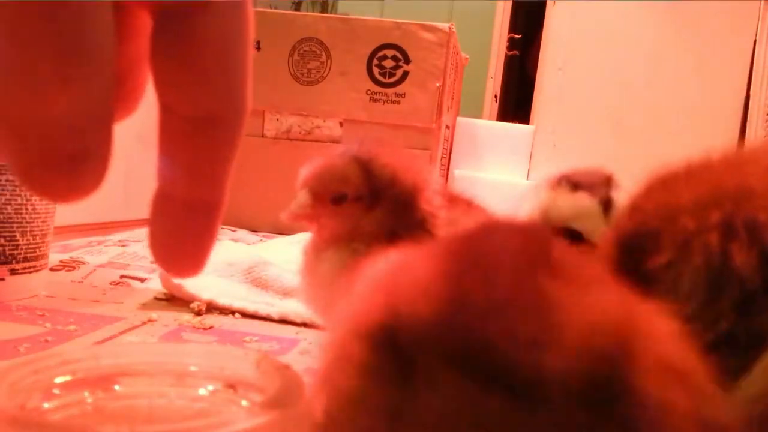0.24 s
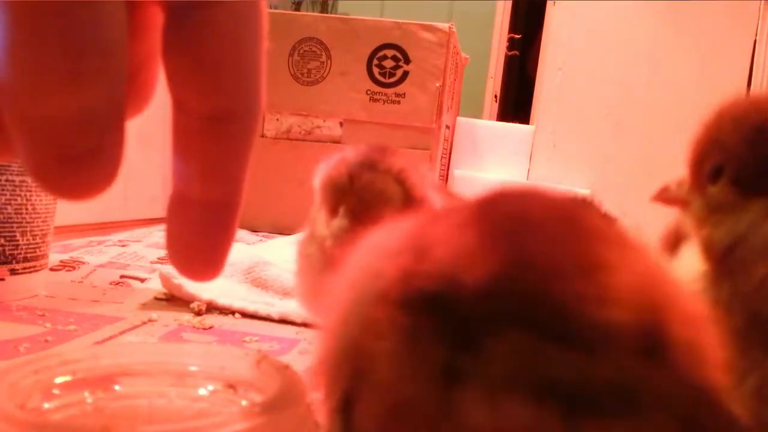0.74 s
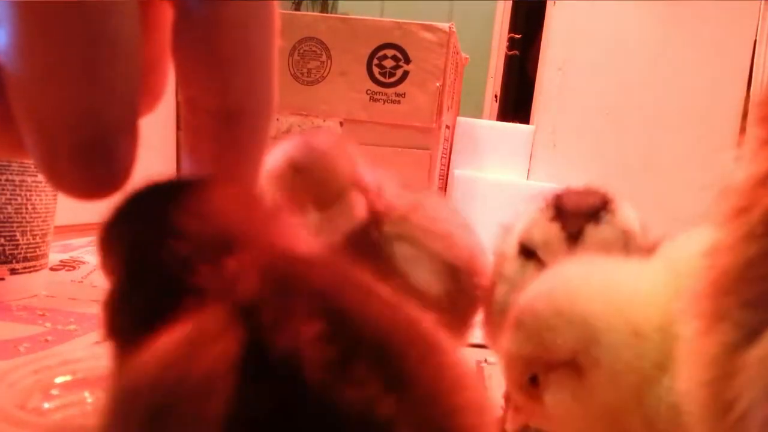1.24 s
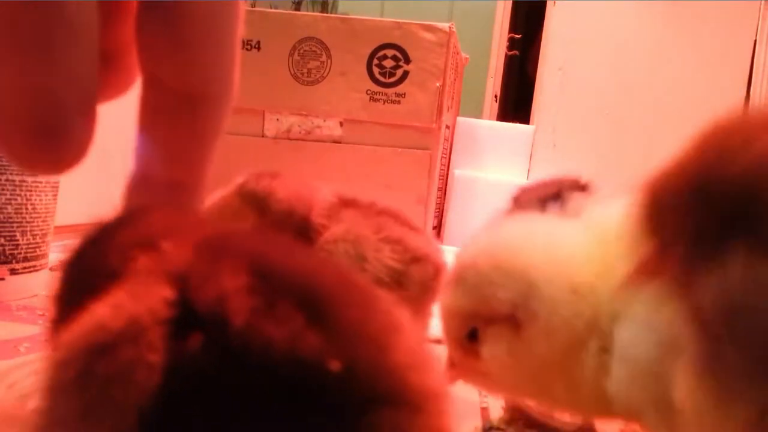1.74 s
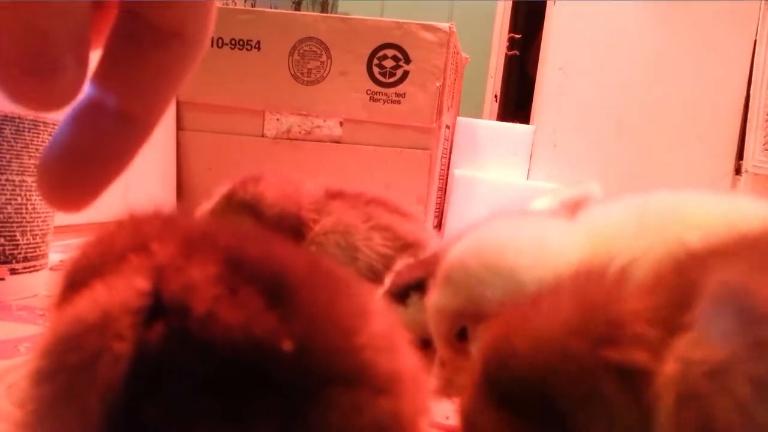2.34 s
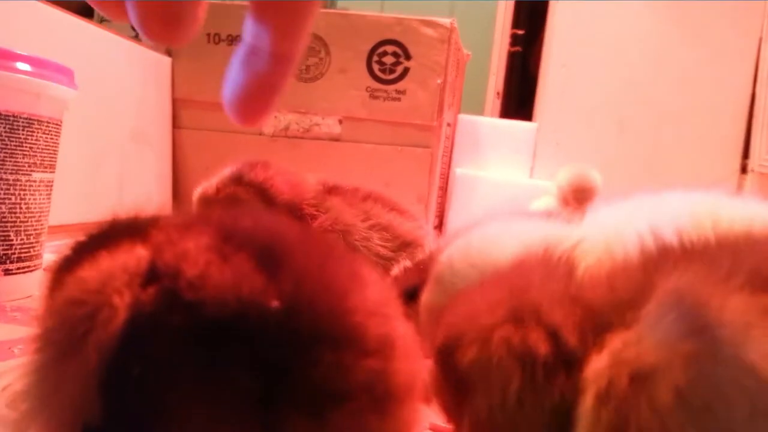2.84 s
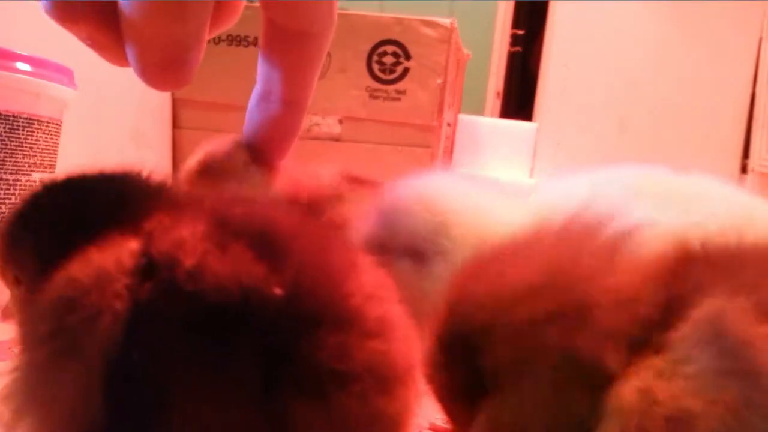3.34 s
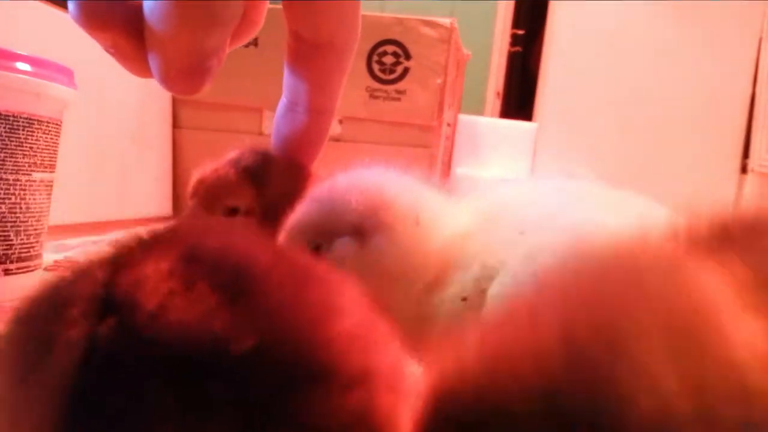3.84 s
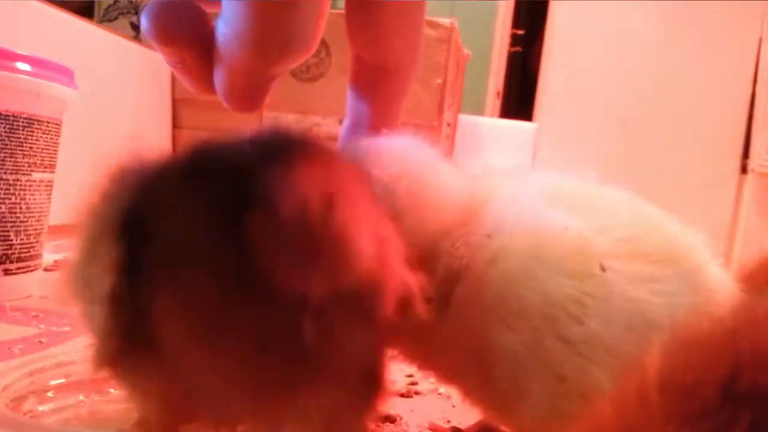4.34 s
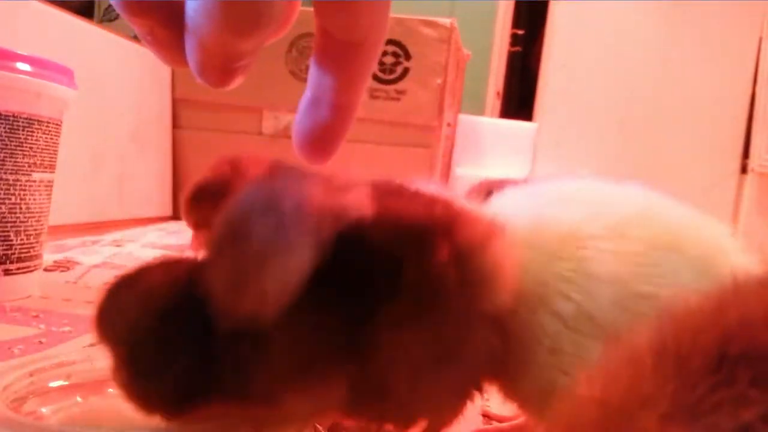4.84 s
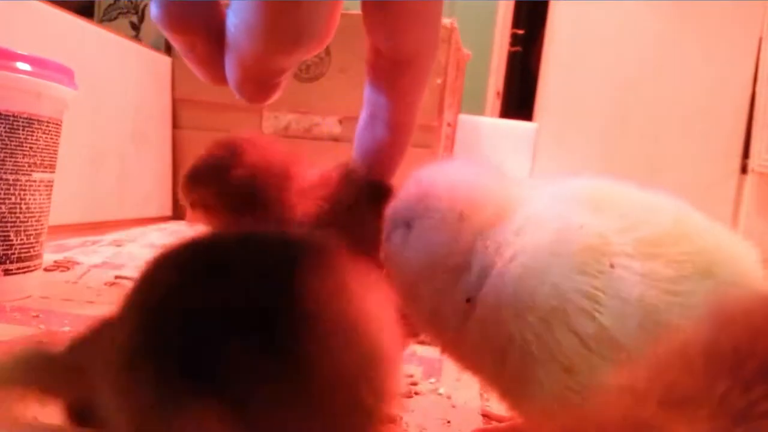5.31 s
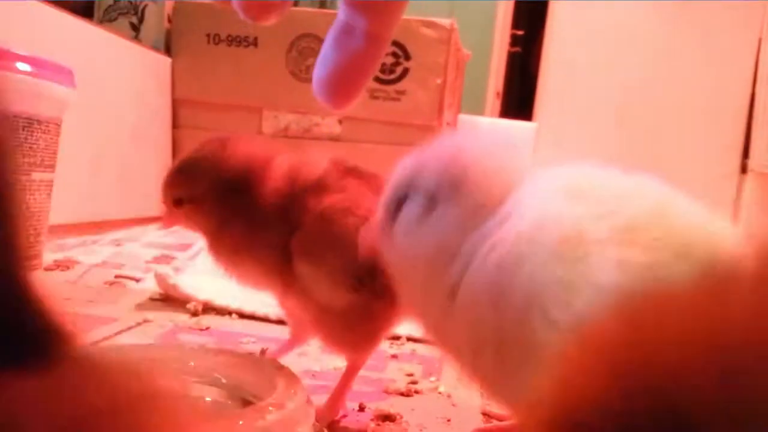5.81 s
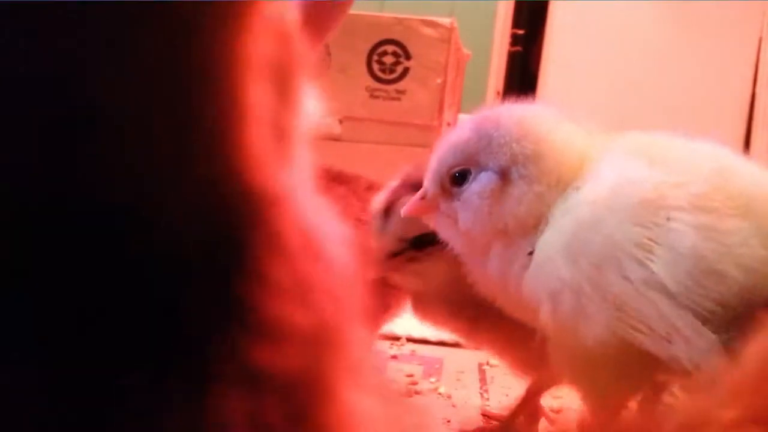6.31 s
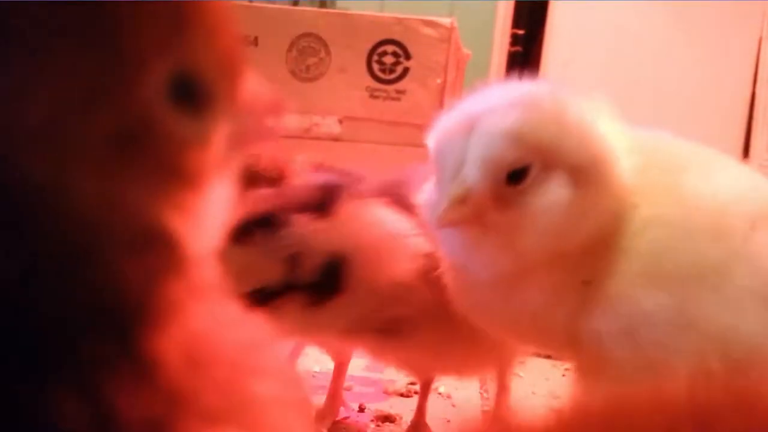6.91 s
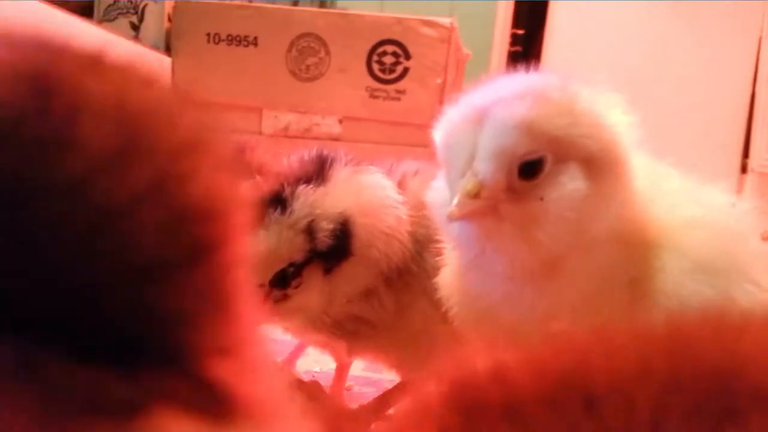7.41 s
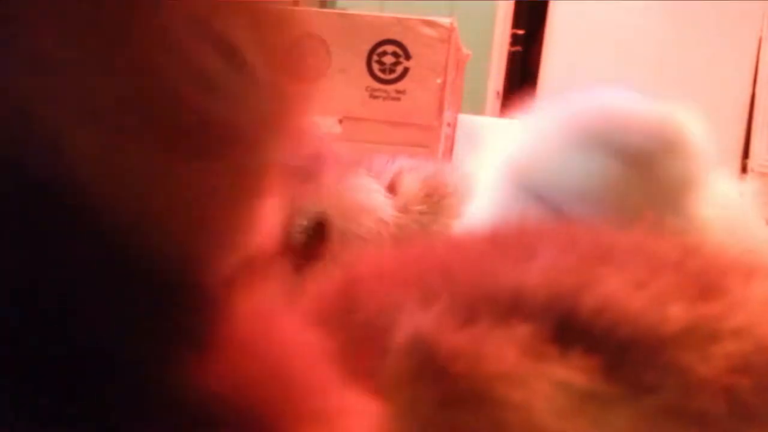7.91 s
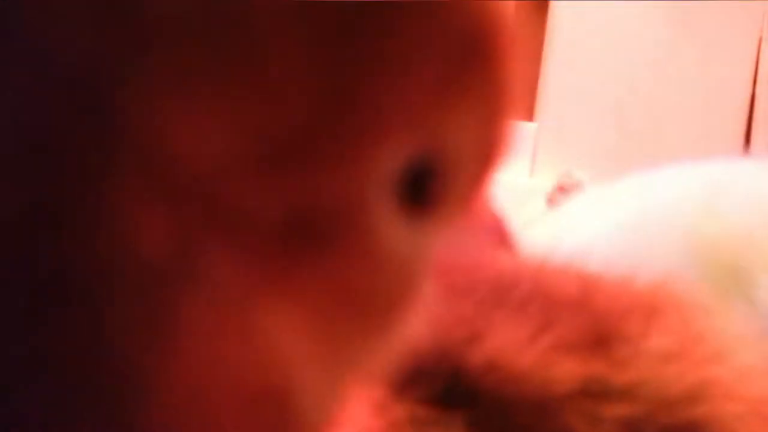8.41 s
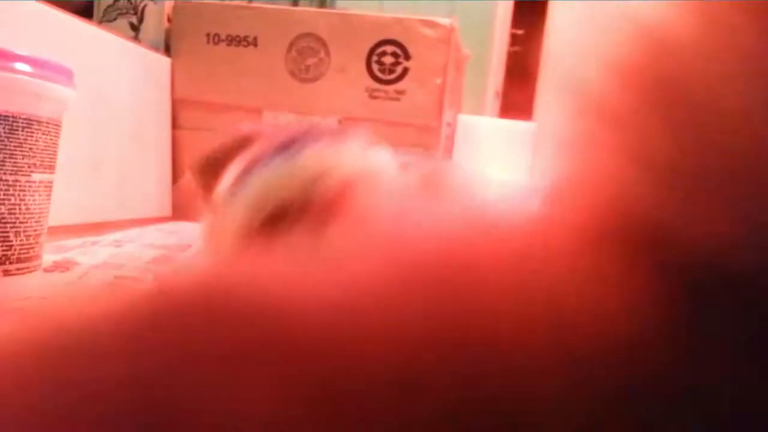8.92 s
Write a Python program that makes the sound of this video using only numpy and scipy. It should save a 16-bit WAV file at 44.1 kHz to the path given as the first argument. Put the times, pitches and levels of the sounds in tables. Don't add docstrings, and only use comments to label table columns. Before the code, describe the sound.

Young chicks peep inches from a phone microphone in a small cardboard pen with a short, boxy echo and faint air hiss. From 0 to 2 seconds, a hard peck opens, then faint quick cheeps mix with blunt knocks, claw ticks and a cluster of scuffing thuds near 1.5. From 2 to 4, it is sparser: soft rising whistles, low reedy peeps, a few pecks and a sharp claw strike around 3. Louder clear peeps come at about 4.2, a brief bright squeal at 4.7, then busy bumping and scraping from 5 to 6, some hits overloading. From 6 to 8, strong and reedy peeps come thicker, with heavy pecks near 7 and 7.5 and an upward reedy squeal at 7.6. From 8 to 9.2, loud overlapping chirps, a very sharp claw snap and a reedy squeal at 8.8, then closing peeps and ticks.

```python
import sys
import numpy as np
from scipy import signal
from scipy.fft import rfft, irfft
from scipy.io import wavfile
from scipy.ndimage import uniform_filter1d

SR = 44100
rng = np.random.default_rng(int(sys.argv[2]) if len(sys.argv) > 2 else 0)


def to_wav(sig):
    pcm = np.clip(np.atleast_2d(sig), -1, 1) * 32767
    pcm = np.round(pcm).astype(np.int16)
    wavfile.write(sys.argv[1], SR, pcm.T)


def ratio_of_db(decibels):
    return 10 ** (np.asarray(decibels, float) / 20)


N = 403956


def band(x, lo_hz, hi_hz):
    return signal.sosfilt(signal.butter(1, [lo_hz, hi_hz], "bandpass", fs=SR, output="sos"), x)


def unit(x):
    return x / np.sqrt(np.mean(x ** 2))


def walk(rate_hz):
    k = int(SR / rate_hz)
    held = np.repeat(rng.standard_normal(N // k + 1), k)
    return unit(uniform_filter1d(uniform_filter1d(held, k), k)[:N])


def add(out, s, sound):
    i = int(s * SR)
    out[i:i + len(sound)] += sound[:len(out) - i]


# pitch_hz [Hz], level_db [dB per Hz]
AIR = [(25, -23), (100, -6.5), (250, 0), (500, -4), (1500, -12), (4000, -14), (6000, -16), (14000, -14.5)]


def air():
    hz, db = np.transpose(AIR)
    f = np.fft.rfftfreq(N, 1 / SR) + 1
    colour = rfft(rng.standard_normal(N)) * ratio_of_db(np.interp(np.log(f), np.log(hz), db))
    out, swell_db = 0, 1.3 * walk(5.5)
    for octave in range(4, 15):
        share = np.clip(1 - np.abs(np.log2(f) - octave), 0, 1)
        out = out + irfft(colour * share, N) * ratio_of_db(swell_db + 1.3 * walk(21))
    return unit(out) * ratio_of_db(-41)


def pen(x):
    t60_s, echo_db = 0.17, -11.5
    t = np.arange(SR // 3) / SR
    echo = rng.standard_normal(len(t)) * 1000. ** (-t / t60_s) * (t > .002)
    return signal.fftconvolve(x, echo / np.sqrt(np.sum(echo ** 2)))[:N] * ratio_of_db(echo_db)


def patter():
    ticks = (rng.random(N) < 50 / SR) * ratio_of_db(1.9 * np.minimum(rng.exponential(size=N), 3.0))
    spread = signal.lfilter([1], [1, -np.exp(-1 / (0.0032 * SR))], ticks)
    return spread * ratio_of_db(-36.5) * unit(band(rng.standard_normal(N), 400, 7500))


# pitch_hz [Hz], level_db [dB], t60_s [s]
FLOOR_MODES = [(264, -15.5, 0.15), (378, -18, 0.075), (560, -22.5, 0.06)]


def floor_ring(blows):
    t = np.arange(SR // 5) / SR
    ring = sum(ratio_of_db(db) * np.sin(2 * np.pi * hz * t) * 1000. ** (-t / t60) for hz, db, t60 in FLOOR_MODES)
    return signal.fftconvolve(blows, ring)[:N]


# middle_s [s], half_length_s [s], dull_db [dB], crisp_db [dB]
SCUFFS = [(0.018, 0.056, -30, -41), (1.316, 0.17, -36.5, -51), (1.478, 0.025, -21.5, -27.5),
          (1.542, 0.087, -27.5, -41), (1.803, 0.019, -44, -52), (2.046, 0.089, -45, -50),
          (2.1, 0.013, -32, -56), (2.74, 0.052, -34.5, -59.5), (3.405, 0.06, -33.5, -43),
          (3.9, 0.008, -27, -39), (4.317, 0.011, -35, -35), (4.451, 0.044, -36, -58),
          (4.754, 0.1, -31.5, -41.5), (5.073, 0.014, -32, -26), (5.196, 0.027, -14.5, -21.5),
          (5.33, 0.058, -31, -52), (5.597, 0.025, -16.5, -33), (5.746, 0.32, -34, -47),
          (5.885, 0.011, -21, -31), (6.016, 0.019, -29, -41), (6.35, 0.063, -40.5, -47),
          (6.654, 0.055, -37.5, -44), (6.979, 0.066, -31, -44), (7.796, 0.24, -34, -51),
          (8.455, 0.46, -42.5, -66.5), (3.753, 0.023, -48.5, -39), (7.428, 0.011, -29.5, -57),
          (8.607, 0.0057, -25.5, -58.5), (8.786, 0.12, -41, -43), (9.082, 0.18, -41, -59)]


def scuffs():
    t = np.arange(N) / SR
    slips = (rng.random(N) < 500 / SR) * ratio_of_db(9.0 * np.minimum(rng.exponential(size=N), 2.4))
    grain = unit(0.09 + signal.lfilter([1], [1, -np.exp(-1 / (0.0021 * SR))], slips))
    dull_gain, crisp_gain = np.zeros(N), np.zeros(N)
    for s, half, dull_db, crisp_db in SCUFFS:
        swell = np.exp(-np.square(np.square((t - s) / half)))
        dull_gain += ratio_of_db(dull_db) * swell
        crisp_gain += ratio_of_db(crisp_db) * swell
    grain += np.clip(dull_gain / ratio_of_db(-12), 0, 1) * (1 - grain)
    dull = dull_gain * grain * unit(band(band(rng.standard_normal(N), 142, 1610), 170, 2930))
    crisp = crisp_gain * grain * unit(band(rng.standard_normal(N), 1100, 9700))
    return ratio_of_db(7.0) * crisp + dull + ratio_of_db(-56) * floor_ring(dull)


# start_s [s], crisp_peak_db [dB], dull_db [dB against the crisp part]
TICKS = [(0.0596, -19, -3), (0.7476, -18.5, -10), (1.003, -26, -6), (1.1673, -26, -8), (1.1832, -16, -2.5),
         (1.373, -23, -5.5), (1.401, -21, -4), (1.4602, -10, 4), (1.5286, -21.5, 13), (1.5795, -32, -4),
         (1.775, -16, -10), (1.785, -13, -28), (2.6235, -24, 1), (2.6939, -24, 3), (2.7255, -21.5, 4.5),
         (2.741, -38, 4), (2.7678, -29, 7), (2.7851, -24, -5), (3.0333, -15, -2), (3.1448, -32, 9),
         (3.498, -26, -4), (3.7956, -18.5, -0.5), (3.928, -16, -5), (3.9963, -23, -26.5),
         (4.0222, -24.5, -21), (4.5458, -24, -20), (4.7427, -19, 0), (4.7837, -15, -10), (4.829, -21, 2),
         (4.8667, -13, -29), (5.0583, -20, -6), (5.1493, -15, -3), (5.1721, -25, 1), (5.345, -39, 13),
         (5.405, -15, -16), (5.583, -17, 8), (5.5882, -10.5, -5), (5.758, -24.5, 10.5), (5.882, -16, 3),
         (5.9478, -20, 3), (5.954, -18, 3), (5.961, -21, 8.5), (5.9825, -14, -3), (6.333, -19, 3),
         (6.6518, -22, -5), (6.7204, -29, -3), (6.9952, -27.5, 10), (7.7589, -12.5, -2), (7.798, -15, 1),
         (8.8302, -1, -23.5), (9.0233, -16, -2), (9.048, -24.5, 1), (9.1285, -16.5, 0)]


def ticks():
    out, t = np.zeros(N), np.arange(SR // 50) / SR
    noises = rng.standard_normal((len(TICKS), 2, len(t)))
    for (s, db, dull_db), (crisp, dull) in zip(TICKS, noises):
        tint = 2 ** np.tanh(crisp[-1] - dull_db / 10)
        snap = band(crisp * np.exp(-t / 0.0017), 2000 * tint, 7000 * tint)
        knock = band(dull * np.exp(-t / 0.0015), 590, 2900)
        snap *= ratio_of_db(db + 1.5) / np.abs(snap).max()
        knock *= ratio_of_db(db + dull_db + 5.0) / np.abs(knock).max()
        add(out, s, snap + knock)
    return out


# start_s [s], thud_peak_db [dB], thud_pitch_hz [Hz], crack_peak_db
# [dB]
KNOCKS = [(0.015, -1, 560, -48), (0.695, -1.5, 378, -22.5), (0.973, -20, 410, -61), (1.452, 2.5, 416, -31),
          (1.789, -6, 684, -52), (2.132, -2.5, 630, -22), (2.288, -6, 482, -21), (2.958, -5.5, 543, -30),
          (3.791, -13.5, 606, -22), (4.636, 3.5, 407, -37), (4.88, -4.5, 454, -38),
          (4.901, -5.5, 385, -18.5), (5.685, 3, 590, -5.5), (6.225, -15.5, 464, -24), (6.242, 0.5, 423, -36),
          (6.902, -6.5, 460, -27), (6.95, 1, 446, -38), (7.534, 1, 433, -15), (8.114, -7, 393, -24),
          (8.266, -5.5, 576, -43), (8.8, -7, 470, -34), (5.6, 1, 403, -25),
          (0.504, -22, 760, -23.5), (0.86, -15, 904, -24), (1.202, -11.5, 720, -48.5), (1.246, 2, 670, -6.5),
        (1.486, 2.5, 830, -35), (1.495, 1.5, 940, -32), (1.863, -19.5, 955, -25.5), (4.608, -29, 795, -21),
        (4.621, 0, 880, -45.5), (5.072, 3, 910, -28), (5.12, -13, 850, -34), (5.243, -41, 836, -14.5),
        (5.415, -45, 965, -30.5), (5.465, -1, 760, -19), (5.479, -16, 810, -18), (5.617, -1.5, 880, -4),
        (5.808, -9.5, 883, -22), (5.873, -7, 880, -32), (6.141, -34, 815, -14.5), (6.615, -4, 940, -27),
        (8.457, -13, 1025, -22),
          (1.079, -21.5, 997, -35), (1.105, -16.5, 1000, -16), (1.8, -3.5, 990, -1.5),
         (3.026, -1.5, 1340, -7.5), (3.087, -17, 1116, -16.5), (3.124, -17, 1280, -55.5),
         (4.428, -2.5, 1360, -11), (4.499, -8.5, 1157, -12), (5.197, 3, 1340, -8), (5.316, -7, 1385, -41.5),
         (5.841, -1, 1186, -8.5), (5.941, -9, 1425, -37), (6.253, -3, 1150, -46), (6.268, -9, 1062, -24),
         (6.694, -11.5, 1010, -52), (8.338, -13.5, 1347, -17), (8.421, -17.5, 1420, -56.5),
         (8.504, -8, 1340, -25), (8.744, -13, 1400, -49.5), (8.816, -3.5, 1150, -32),
         (1.926, -20, 1160, -42), (1.949, -26, 1100, -29.5), (6.518, -19.5, 1026, -27)]


def taps():
    out, blows = np.zeros(N), np.zeros(N)
    t = np.arange(SR // 10) / SR
    hits = KNOCKS
    grit = rng.standard_normal((len(hits), 3, len(t)))
    tints = 2.4 ** rng.random(len(hits))
    snap = t * np.exp(-t / .0011)
    for (s, thud_db, hz, crack_db), (dull, crisp, wash), tint in zip(hits, grit, tints):
        thud = band(dull * t * np.exp(-t / 0.0013), 0.5 * hz, 1.53 * hz)
        thud = band(thud, 0.18 * hz, 2.54 * hz)
        thud *= ratio_of_db(thud_db) / np.abs(thud).max()
        crack = band(snap * crisp, 1500 * tint, 5000 * tint)
        crack *= ratio_of_db(5.5 + crack_db) / np.abs(crack).max()
        add(out, s - .0015, thud + crack)
        add(out, s, ratio_of_db(thud_db - 16.0) * unit(band(wash, 127, 1370)) * np.exp(-t / 0.0061))
        add(blows, s, thud)
    return out + ratio_of_db(-38.0) * floor_ring(blows)


def phrase(rows, first, octaves_per_s, crest_s, droop, first_db, mid_db, end_db, last_db):
    bend = 0.068
    calls = []
    for s, hold, hz, end_hz, db in rows:
        knee, span = s + max(hold, 1 / 1000), end_hz - hz
        glide = abs(np.log2(end_hz / hz)) / octaves_per_s + 1 / 1000
        top = knee + glide
        calls.append([(s, first * hz, db + first_db),
                      (knee, hz, db),
                      (knee + glide / 4, hz + (1 / 4 - bend) * span, db + mid_db / 2),
                      (knee + glide / 2, hz + span / 2, db + mid_db),
                      (knee + glide * 3 / 4, hz + (3 / 4 + bend) * span, db + (mid_db + end_db) / 2),
                      (top, end_hz, db + end_db),
                      (top + crest_s / 2, end_hz * (1 - droop / 5), db + (end_db + last_db) / 2),
                      (top + crest_s, end_hz * (1 - droop), db + last_db)])
    return calls


# pitch_hz [Hz], level_db [dB]
BEAK = [(2500, -3), (3100, -0.76), (3700, -0.6), (4300, -0.3), (5400, -5.5)]
TRILLED_S = {7.271: (7.29, 7.33), 7.594: (7.59, 7.628), 6.779: (6.775, 6.802)}


def peeps(calls, octave_db, fade_s=0.0036):
    attack_s, scoop, scoop_s = .004, .05, .003
    ease = SR // 180
    out = np.zeros(N)
    tremor = 1 + .006 * walk(200)
    flutter_db = .6 * walk(120) + .6 * walk(500)
    lags = 1.6 / 1000 * (1 + rng.random(len(calls))) / 2
    for call, lag in zip(calls, lags):
        s, hz, db = np.transpose(call)
        t = np.arange(s[0] - attack_s, s[-1] + fade_s, 1 / SR)
        here = np.minimum((t * SR).astype(int), N - 1)
        level = np.interp(t, s, ratio_of_db(db))
        glide = uniform_filter1d(uniform_filter1d(np.interp(t, s, hz), ease), ease)
        trilling = np.zeros(len(t))
        for start, (a, b) in TRILLED_S.items():
            trilling += (abs(start - s[0]) * SR < ease) * (t > a) * (t < b)
        trill = np.sin(2 * np.pi * 190 * t) * trilling
        pitch = glide * tremor[here] * (1 - scoop * np.exp((t[0] - t) / scoop_s)) * (1 + 0.043 * trill)
        phase = 2 * np.pi * np.cumsum(pitch) / SR
        throat = 1 / (1 + ((2 * pitch - 5300) / 800) ** 4)
        wave = np.sin(phase) + ratio_of_db(octave_db) * (throat + level / 2) * np.sin(2 * phase)
        wave *= np.abs(1 + .3 * np.exp(2j * np.pi * glide * lag))
        wave *= 1 + 0.7 * trill
        flicker = 1 + np.interp(glide, (3300, 4300), (0, 1)) * np.clip(-db.max() / 6, 0, 4)
        gain = ratio_of_db(flicker * flutter_db[here] + np.interp(glide, *np.transpose(BEAK)))
        edge = np.clip(np.minimum((t - t[0]) / attack_s, (t[-1] - t) / (2 * fade_s)), 0, 1) ** 2
        add(out, t[0], np.sqrt(2) * level * gain * edge * wave)
    return out


# start_s [s], hold_s [s], held_pitch_hz [Hz], end_pitch_hz [Hz], level_db [dB]
EVEN_PEEPS = [(2.608, 0.001, 2930, 4160, -22.5), (4.181, 0.044, 2798, 4260, -8.5),
              (4.825, 0.015, 2890, 4300, -19.5), (7.111, 0.018, 3317, 5220, -19.5),
              (8.2, 0.032, 3144, 4650, -4), (6.116, 0.004, 2960, 4300, -22), (1.28, 0.003, 3100, 4600, -22)]
EVEN = dict(first=0.99, octaves_per_s=23, crest_s=0.022, droop=.02,
            first_db=-11, mid_db=-4, end_db=-15.5, last_db=-26)
# start_s [s], hold_s [s], held_pitch_hz [Hz], end_pitch_hz [Hz], level_db [dB]
FLICKS = [(0.035, 0.0055, 3330, 5140, -26), (3.393, 0.0076, 3470, 4870, -24),
          (5.632, 0.027, 2820, 4430, -21), (6.028, 0.014, 2700, 5000, -25),
          (7.028, 0.0041, 3180, 4850, -26), (7.594, 0.024, 3310, 4800, -24.5),
          (7.7, 0.015, 2940, 4330, -26.5)]
FLICK = dict(first=1.005, octaves_per_s=25, crest_s=0.0069, droop=0.073,
             first_db=3.5, mid_db=0.5, end_db=-6.5, last_db=-21)
# start_s [s], hold_s [s], held_pitch_hz [Hz], end_pitch_hz [Hz], level_db [dB]
SLIDES = [(1.227, 0.032, 2660, 2990, -26), (1.654, 0.034, 3720, 3410, -25), (8.702, 0.036, 4250, 4100, -28),
          (5.162, 0.039, 2970, 3140, -10.5), (7.018, 0.023, 3075, 3060, -15.5),
          (7.968, 0.037, 3860, 3260, -28), (9.14, 0.032, 3070, 2920, -10)]
SLIDE = dict(first=0.97, octaves_per_s=9.8, crest_s=0.0024, droop=.006,
             first_db=-6, mid_db=2, end_db=-9, last_db=-1)
# start_s [s], hold_s [s], held_pitch_hz [Hz], end_pitch_hz [Hz], level_db [dB]
DIPS = [
    (3.61, 0.039, 2830, 4650, -21),
    (6.24, 0.027, 3190, 4230, -10.5),
    (7.743, 0.038, 3180, 4300, -21),
    (8.918, 0.027, 3210, 4580, -12),
]
DIP = dict(first=1.07, octaves_per_s=23, crest_s=0.013, droop=.005,
           first_db=-5.5, mid_db=-4, end_db=-23, last_db=-12)
# start_s [s], hold_s [s], held_pitch_hz [Hz], end_pitch_hz [Hz], level_db [dB]
SWELLS = [(1.694, 0.026, 3162, 5200, -16), (2.532, 0.022, 2967, 5100, -17.5),
          (3.573, 0.016, 2980, 4670, -25.5), (4.385, 0.033, 3415, 4440, -19),
          (9.097, 0.0034, 2830, 4950, -27.5)]
SWELL = dict(first=1.01, octaves_per_s=18.5, crest_s=0.017, droop=0.066,
             first_db=-6.5, mid_db=7.5, end_db=-3, last_db=-20)
# start_s [s], hold_s [s], held_pitch_hz [Hz], end_pitch_hz [Hz], level_db [dB]
HOOKS = [
    (3.917, 0.025, 3044, 4785, -13.5),
    (4.221, 0.027, 3430, 4760, -14),
    (6.779, 0.0068, 2860, 4700, -24.5),
]
HOOK = dict(first=0.99, octaves_per_s=23, crest_s=0.0197, droop=0.207,
            first_db=-5.5, mid_db=-4, end_db=-2.5, last_db=-29)
# start_s [s], hold_s [s], held_pitch_hz [Hz], end_pitch_hz [Hz], level_db [dB]
FALLS = [
    (8.757, 0.0265, 3380, 3450, -20.5),
    (8.975, 0.035, 4200, 4080, -36.5),
    (0.0065, 0.023, 3050, 2800, -35),
]
FALL = dict(first=1.04, octaves_per_s=13, crest_s=0.004, droop=.005,
            first_db=-5, mid_db=1, end_db=-5, last_db=2.5)
# start_s [s], hold_s [s], held_pitch_hz [Hz], end_pitch_hz [Hz], level_db [dB]
REEDY_PEEPS = [
    (0.792, 0.047, 2770, 4450, -18.5),
    (2.17, 0.018, 2540, 4700, -22),
    (3.382, 0.028, 2750, 4530, -23),
]
REEDY = dict(first=0.96, octaves_per_s=42, crest_s=0.0077, droop=0.038,
             first_db=-8.5, mid_db=-1, end_db=-18, last_db=-24)
# start_s [s], hold_s [s], held_pitch_hz [Hz], end_pitch_hz [Hz], level_db [dB]
REEDY_DIPS = [
    (1.967, 0.04, 2640, 4570, -16),
    (2.335, 0.023, 2780, 4290, -23),
    (6.285, 0.0507, 2600, 4260, -9.5),
]
REEDY_DIP = dict(first=1.03, octaves_per_s=43, crest_s=0.0052, droop=0.023,
                 first_db=-9, mid_db=-11.5, end_db=-7.5, last_db=-16)
# start_s [s], pitch_hz [Hz], level_db [dB]
SQUEAL_CLEAR = [(4.642, 3460, -18.5), (4.664, 3430, -16), (4.678, 3700, -1), (4.7, 4385, -1),
                (4.713, 4340, -21), (4.724, 3030, -22)]
# start_s [s], pitch_hz [Hz], level_db [dB]
SQUEAL_REEDY = [(8.798, 2710, -17), (8.813, 3160, -37), (8.836, 4260, -6.5), (8.855, 4310, -2.5),
                (8.865, 3180, -18), (8.872, 2730, -5), (8.883, 2280, -20)]
# start_s [s], pitch_hz [Hz], level_db [dB]
SQUEAL_SLIDE = [(7.628, 2540, -10.5), (7.637, 2740, -12.5), (7.661, 2710, -5.5), (7.672, 3140, -6),
                (7.696, 3960, -23.5)]
# start_s [s], pitch_hz [Hz], level_db [dB]
DRAWL_CLEAR = [(7.011, 3040, -19), (7.022, 3300, -13), (7.045, 3470, -16), (7.06, 3800, -15.5),
               (7.074, 4280, -17), (7.084, 4390, -25), (7.092, 4030, -28.5)]
# start_s [s], pitch_hz [Hz], level_db [dB]
DRAWL_REEDY = [(8.198, 2745, -20), (8.216, 2853, -8), (8.244, 3113, -6.5), (8.268, 3870, -33)]
# start_s [s], pitch_hz [Hz], level_db [dB]
EARLY_TUNES = [
    [(.627, 2940, -27), (.64, 3610, -19.5), (.655, 3970, -22), (.666, 4440, -28)],
    [(.645, 3560, -29), (.665, 3270, -30), (.677, 3310, -20), (.684, 2770, -11)],
    [(.768, 4120, -22), (.79, 3850, -17), (.805, 3620, -21), (.814, 3050, -33)],
    [(.873, 3360, -19), (.888, 3310, -15), (.897, 3010, -31), (.91, 3390, -12), (.92, 3650, -12.5),
     (.935, 4910, -27), (.948, 5050, -19)],
    [(1.223, 4620, -27), (1.235, 4590, -16.5), (1.243, 4100, -22), (1.255, 3890, -17), (1.266, 3480, -19.5),
     (1.275, 2860, -18)],
    [(1.437, 3300, -34), (1.46, 3290, -19), (1.475, 3070, -21), (1.485, 2870, -21), (1.5, 2950, -25)],
    [(1.566, 2950, -21), (1.576, 3156, -25), (1.59, 3850, -35), (1.605, 4270, -36.5), (1.615, 4200, -43)],
    [(2.896, 3030, -27), (2.905, 2925, -16.5), (2.92, 2984, -16), (2.934, 3630, -31), (2.942, 4370, -36.5),
     (2.952, 4680, -23), (2.962, 4500, -36)],
    [(3.234, 3720, -24), (3.255, 3270, -20), (3.262, 3240, -14)],
    [(3.358, 3860, -26), (3.372, 3580, -31), (3.382, 3180, -21), (3.388, 3270, -29)],
    [(4.935, 3600, -17), (4.955, 3260, -11.5), (4.97, 3370, -14.5), (4.98, 3800, -29), (4.992, 4740, -31)],
    [(5.695, 3310, -27), (5.712, 3130, -45), (5.725, 3520, -9), (5.735, 4100, -11.5), (5.75, 5000, -14),
     (5.765, 4340, -34)],
]
# start_s [s], pitch_hz [Hz], level_db [dB]
LATE_TUNES = [
    [(6.415, 3350, -34), (6.434, 3130, -38), (6.443, 3570, -24.5), (6.453, 4580, -32), (6.466, 4500, -27)],
    [(6.569, 3170, -25), (6.58, 3470, -13.5), (6.6, 3400, -10.5), (6.61, 3770, -16), (6.622, 4430, -18),
     (6.63, 4580, -24), (6.64, 4540, -36)],
    [(7.062, 3080, -27), (7.08, 3110, -20.5), (7.093, 3200, -23), (7.101, 4170, -29), (7.108, 4520, -21.5),
     (7.117, 4080, -28)],
    [(7.271, 3505, -19), (7.285, 3590, -18), (7.305, 3670, -18.5), (7.315, 4140, -33), (7.325, 4260, -20),
     (7.333, 3900, -29)],
    [(7.295, 2890, -29), (7.307, 2650, -19), (7.32, 3280, -20.5), (7.326, 3670, -32.5), (7.34, 5140, -44)],
    [(7.644, 3636, -9.5), (7.665, 3500, -21), (7.68, 3980, -5.5), (7.694, 4520, -11), (7.705, 5000, -26),
     (7.713, 5250, -28)],
    [(8.286, 2980, -23), (8.31, 2850, -25), (8.318, 3210, -21.5), (8.324, 3400, -14), (8.336, 4400, -14),
     (8.355, 5630, -25), (8.372, 4760, -23)],
    [(8.394, 4200, -31), (8.408, 3505, -24), (8.42, 3490, -18.5), (8.428, 4060, -23), (8.436, 4540, -33.5),
     (8.45, 3680, -30)],
    [(8.47, 2924, -27), (8.485, 3370, -25), (8.495, 3800, -20), (8.508, 4580, -30.5), (8.518, 4100, -39)],
    [(8.48, 3260, -16), (8.505, 3164, -9.5), (8.514, 3450, -30), (8.522, 4100, -20), (8.529, 4870, -35),
     (8.541, 5300, -35)],
]
# start_s [s], pitch_hz [Hz], level_db [dB]
REEDY_TUNES = [
    [(3.012, 2620, -21), (3.031, 2664, -18.5), (3.048, 2570, -13), (3.061, 2760, -13), (3.072, 3830, -35),
     (3.078, 4010, -16.5), (3.087, 3770, -28)],
    [(3.238, 3120, -32), (3.255, 2824, -17), (3.269, 3060, -20.5), (3.281, 3870, -28), (3.289, 4750, -40)],
    [(4.935, 2790, -22), (4.965, 2563, -17.5), (4.988, 2910, -17), (4.998, 3700, -24), (5.006, 4000, -20.5),
     (5.015, 3770, -34)],
    [(6.638, 3060, -21), (6.654, 2850, -13), (6.666, 3060, -19), (6.675, 3930, -19.5), (6.686, 4500, -24)],
]


def chicks():
    clear = phrase(EVEN_PEEPS, **EVEN) + phrase(FLICKS, **FLICK) + phrase(SLIDES, **SLIDE)
    clear += phrase(DIPS, **DIP) + phrase(SWELLS, **SWELL) + phrase(HOOKS, **HOOK) + phrase(FALLS, **FALL)
    clear += [SQUEAL_CLEAR, DRAWL_CLEAR] + EARLY_TUNES + LATE_TUNES
    reedy = phrase(REEDY_PEEPS, **REEDY) + phrase(REEDY_DIPS, **REEDY_DIP)
    reedy += [SQUEAL_REEDY, SQUEAL_SLIDE, DRAWL_REEDY] + REEDY_TUNES
    return peeps(clear, octave_db=-22.0) + peeps(reedy, octave_db=-14)


def scene():
    voices, knocks = chicks(), taps()
    stir = np.sqrt(np.abs(unit(uniform_filter1d(np.abs(knocks), SR // 4))))
    feet = knocks + scuffs() + stir * patter() + ticks()
    loud = uniform_filter1d(np.abs(voices), SR // 30) / ratio_of_db(-24) + ratio_of_db(-12)
    echo = pen(voices * loud ** -.42 + feet)
    highpass = signal.butter(3, 165, "highpass", fs=SR, output="sos")
    near, echo = signal.sosfilt(highpass, [voices + feet, echo])
    return (near + echo + air())[None]


def roll_off(x):
    return signal.sosfilt(signal.butter(12, 14300, fs=SR, output="sos"), x)


def record(dry):
    body = signal.sosfiltfilt(signal.butter(6, 5600, fs=SR, output="sos"), dry)
    heard = body + ratio_of_db(-3) * (dry - body)
    return roll_off(np.clip(heard, -1, 1))


dry = scene()
out = record(dry)
to_wav(out)
```